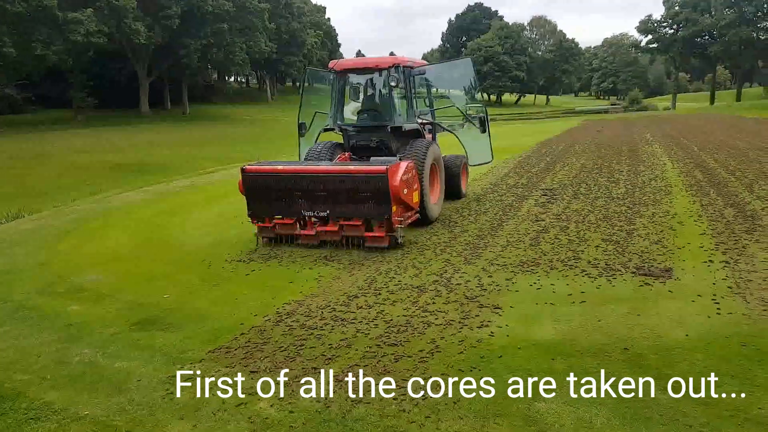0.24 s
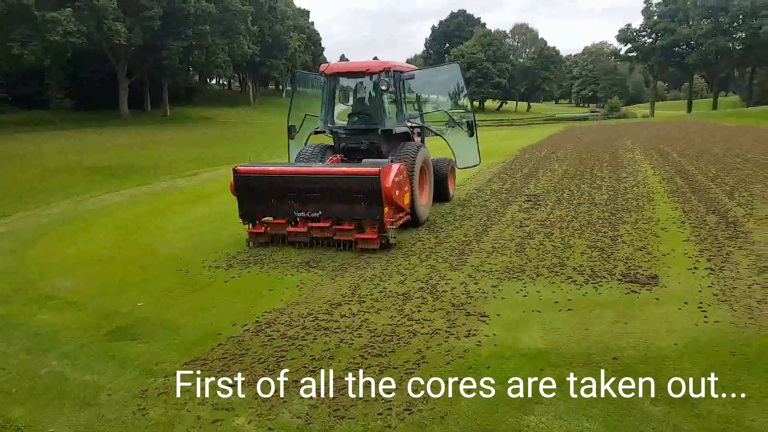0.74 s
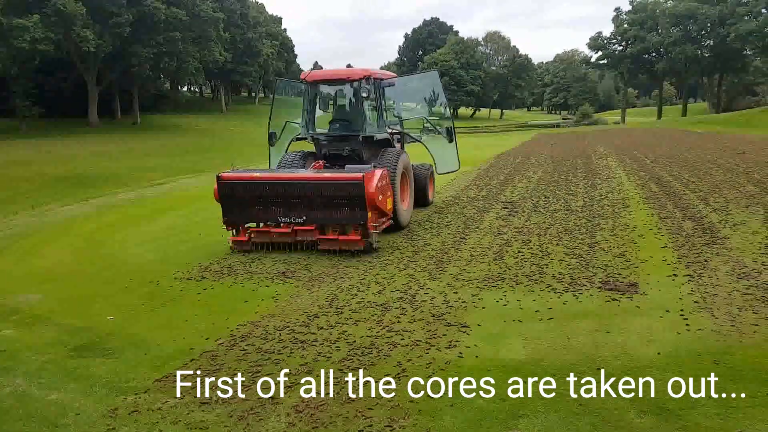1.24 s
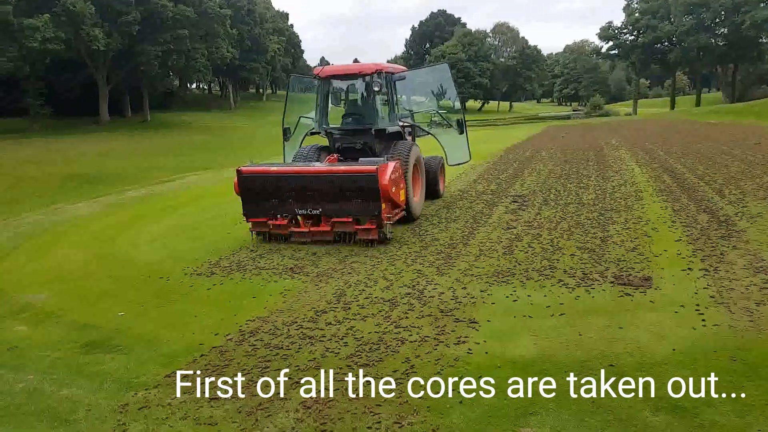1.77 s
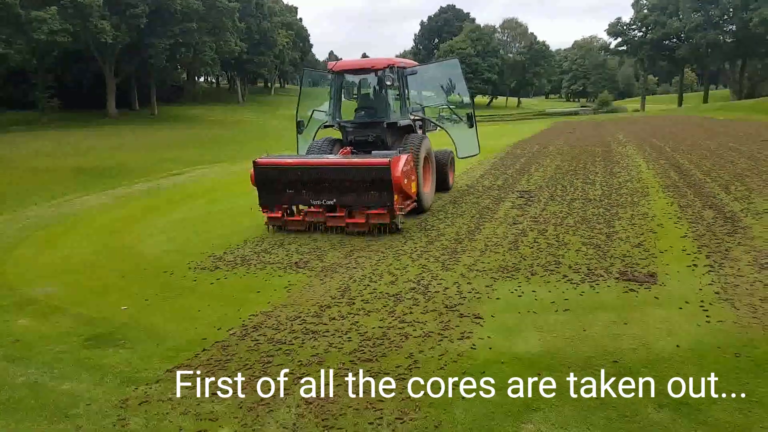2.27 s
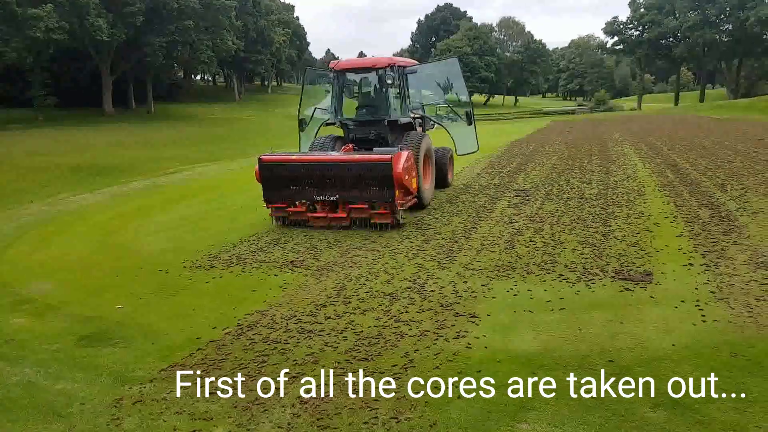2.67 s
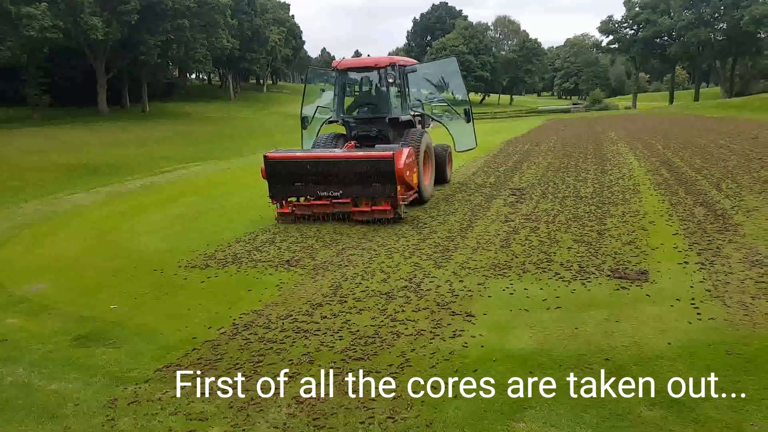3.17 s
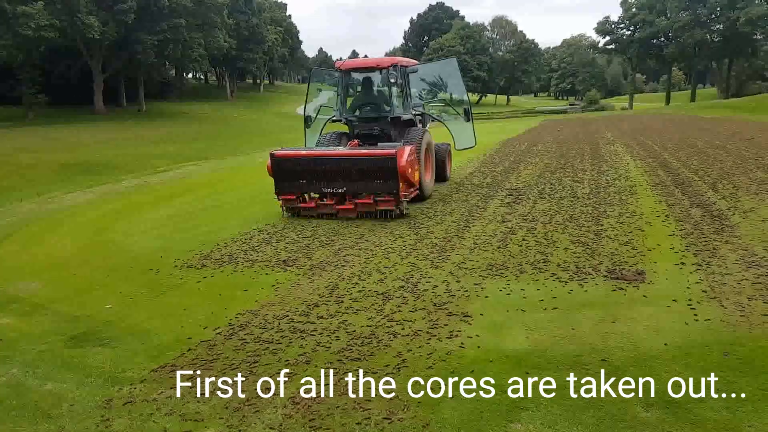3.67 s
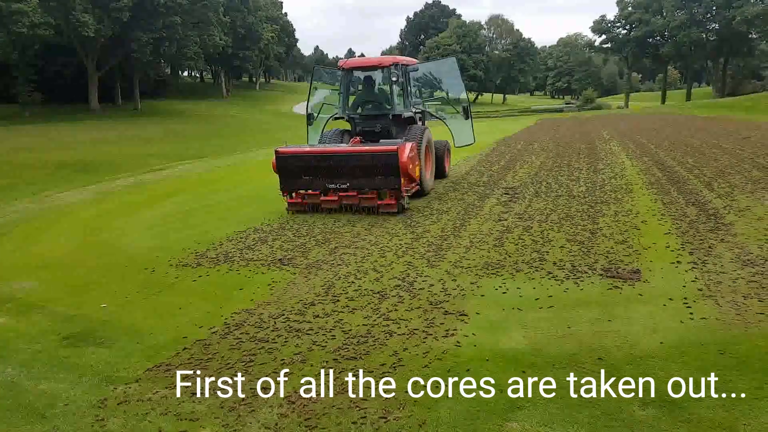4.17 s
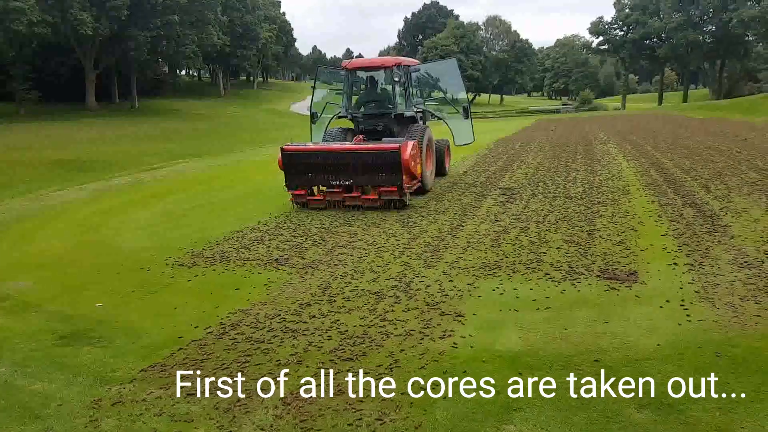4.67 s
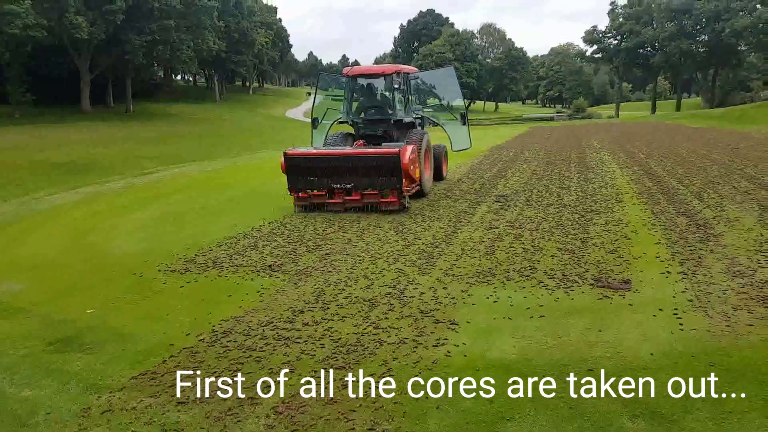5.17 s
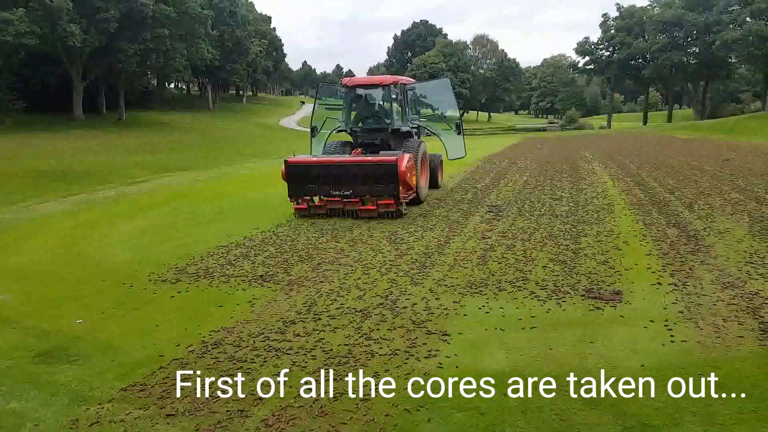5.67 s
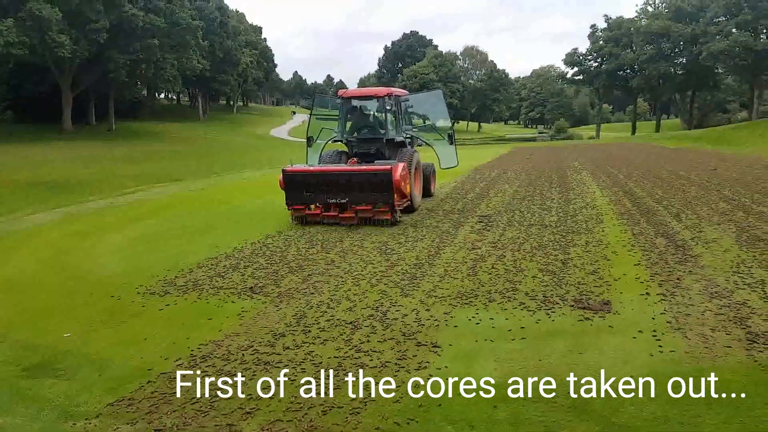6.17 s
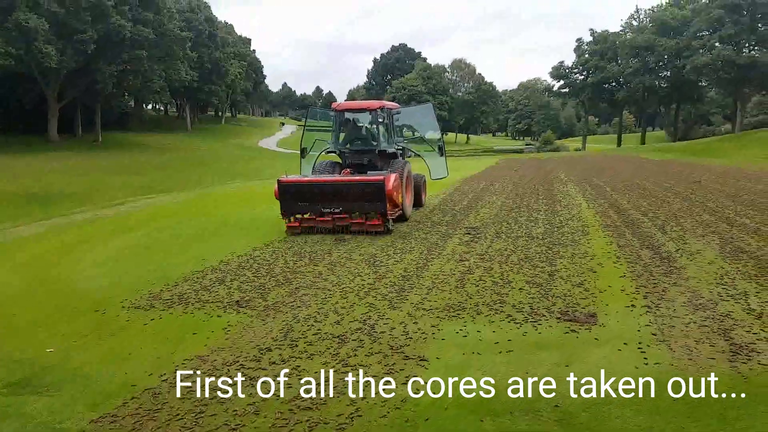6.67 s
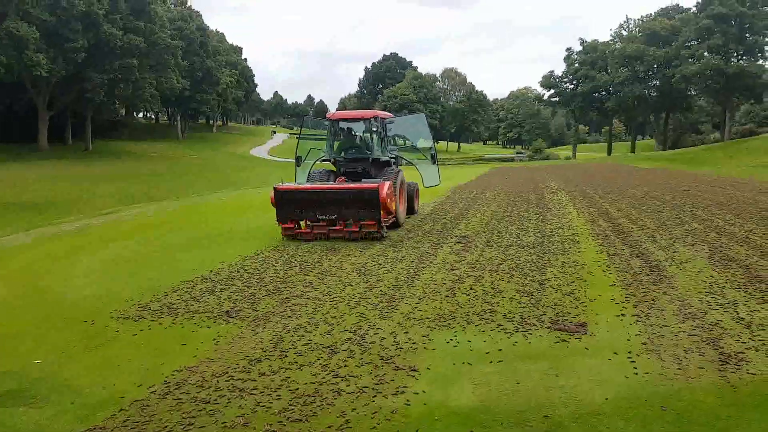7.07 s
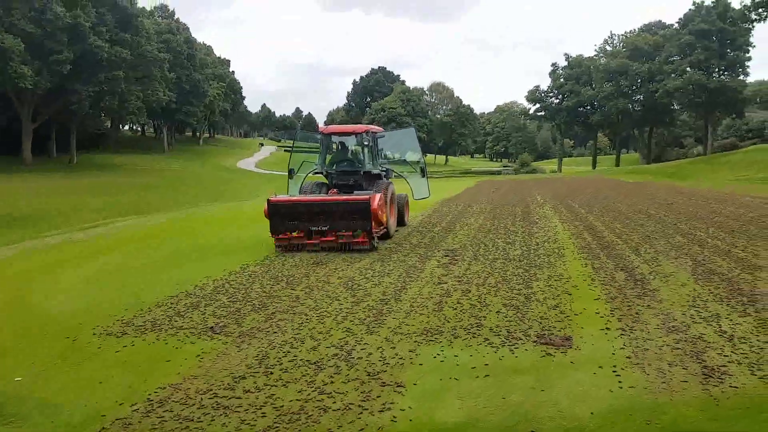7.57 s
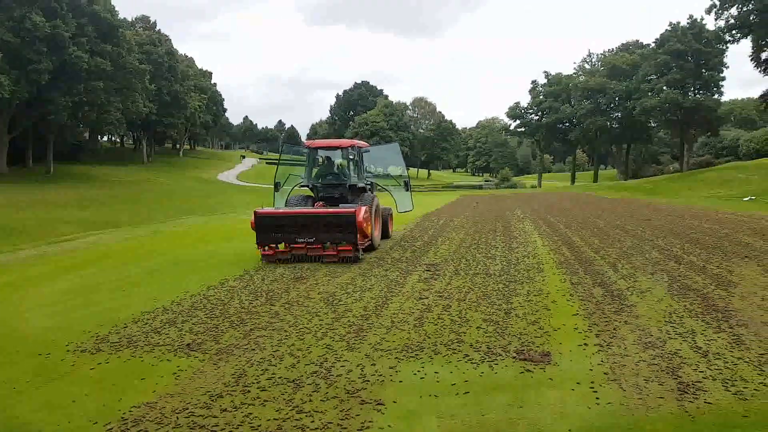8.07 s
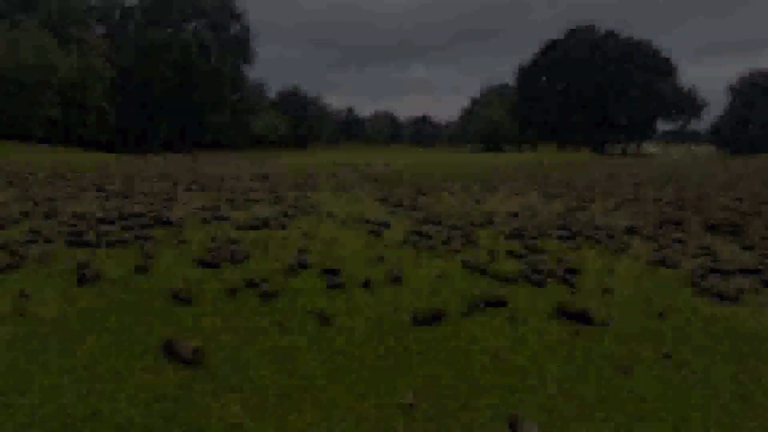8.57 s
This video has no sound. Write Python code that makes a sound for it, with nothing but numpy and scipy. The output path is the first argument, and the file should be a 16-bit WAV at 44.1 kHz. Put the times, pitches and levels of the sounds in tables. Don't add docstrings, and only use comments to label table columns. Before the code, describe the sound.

A rough, low-mid diesel roar with valve clatter and gear whine fills the foreground, with scattered metallic ticks. The engine pitch climbs over a second or so, then holds steady while steel tines clank in a rapid, uneven but regular chatter. Everything recedes gently across open grass, with no room echo, heard through a handheld phone with narrow stereo lows and wider treble, until a sudden cut.

```python
import sys
import numpy as np
from scipy import signal
from scipy.fft import rfft, irfft, next_fast_len
from scipy.io import wavfile
from scipy.ndimage import uniform_filter1d, map_coordinates

SR = 44100
rng = np.random.default_rng(int(sys.argv[2]) if len(sys.argv) > 2 else 0)


def wav_record(signal):
    frames = np.transpose(np.atleast_2d(signal))
    bounded = np.clip(frames, -1, 1)
    quanta = np.round(bounded * 32767).astype(np.int16)
    wavfile.write(sys.argv[1], SR, quanta)


def linear_from_db(decibels):
    return 10 ** (np.asarray(decibels, float) / 20)


N = 389824

# (time [s], firing rate [Hz])
ENGINE_SPEED = [(0, 66.05), (1.3, 66.1), (1.45, 67.2), (1.6, 69.9), (1.75, 72.2), (1.98, 74.1),
                (2.23, 75.9), (2.48, 77.05), (2.73, 77.85), (2.98, 78.25), (3.5, 78.17), (6, 78.2),
                (8.3, 78.3)]
# (multiple of firing [ratio], level [dB])
WEAK_ORDERS = [(0.749, -56.5), (1.4, -43.5), (1.5, -62), (2.75, -36.5), (3.25, -36), (3.5, -38),
               (5.25, -47), (5.75, -45), (7, -50.5), (8, -46)]
# (harmonic [number], level [dB], load group [index])
PUMP_HARMONICS = [(1, -36, 0), (2, -38, 0), (3, -48, 0), (5, -55, 1), (6, -46, 1), (7, -51, 2), (8, -52, 3),
                  (9, -64, 2)]
# (harmonic [number], level [dB])
GEAR_MESH = [(1, -36), (2, -35.5), (3, -56.5), (4, -51.5)]
# (idle [dB], added at full speed [dB], added under throttle [dB], share of distance loss [ratio])
PUMP_LAWS = [
    (1, -9.5, -0.5, .7),
    (-8, 3, -.5, 1.5),
    (-9, -9, -.5, .1),
    (-4, -14, -3, .1),
]
# (group [index], start [s], end [s], gain [dB])
PUMP_SWELLS = [
    (1, 0.2, 1.43, 7.5),
    (1, 0.8, 1.43, 4),
    (2, .2, 1.3, 8.5),
    (2, .7, 1.43, 4),
    (3, -.2, .6, 7.5),
    (1, 1.75, 2.55, 5),
    (1, 3.35, 4.75, 5.5),
]
# (frequency [Hz], level [dB], t60 [s])
TINE_HEADS = [(1505, -2.5, 0.054), (2051, -4, 0.093), (3190, -10.5, 0.11), (3486, -8, 0.049),
              (3840, -14, 0.046), (4200, -20.5, 0.054), (5280, -16, .07), (6160, -22.5, .07),
              (6530, -21.5, .06), (7109, -25, .06), (8300, -22.5, 0.065), (9597, -28, .07),
              (10700, -30.5, 0.062), (11137, -27, 0.067), (11936, -27.5, .07)]
# (time [s], peak [dB], high spray over peak [dB])
LOOSE_KNOCKS = [
    (0.0687, -29, -23),
    (0.2194, -34, -21.5),
    (0.564, -29, -13),
    (0.6894, -32.5, -21.5),
    (1.5894, -31.5, -20.5),
    (1.6794, -36.5, -21),
    (1.7694, -31, -24.5),
]
# (time [s], peak [dB], high spray over peak [dB])
ODD_STROKES = [(1.9939, -25.5, -26.5), (2.1131, -23, -26), (2.2283, -23, -26.5), (2.5611, -23.5, -27),
               (2.6687, -22.5, -23), (2.7744, -33, -22.5), (2.8934, -20.5, -19.5), (3.328, -25, -19),
               (3.4424, -34.5, -22), (3.6531, -25, -23), (3.7658, -24.5, -27.5), (3.9809, -23.5, -25),
               (4.0881, -31.5, -23.5), (4.2049, -27, -17), (4.6433, -23, -17.5), (4.749, -24.5, -20.5),
               (4.8559, -25.5, -26), (4.9666, -25.5, -23), (5.0764, -26, -21.5), (5.299, -24.5, -20.5),
               (5.5154, -35, -22), (5.6194, -26.5, -23), (5.8374, -38.5, -24), (6.2776, -25.5, -27.5),
               (6.7181, -36.5, -25), (6.8194, -33.5, -25), (7.1557, -27, -24), (7.2617, -26, -27),
               (7.3708, -25, -25), (7.8102, -25.5, -27)]
# (time [s], level [dB])
FAN_LEVEL = [(0, -23.5), (1, -30), (2, -28.5), (3, -25.5), (4, -30), (5, -27.5), (6, -29.5), (7, -29.5),
             (8.3, -26.5)]
# (frequency [Hz], density [dB per Hz])
BODY_COLOUR = [(18, -43.5), (30, -29.5), (63, -11.5), (113, -6.5), (152, -2), (194, -2.5), (252, -3.5),
               (417, -4), (595, -5), (744, -8), (1020, -3), (1260, -5.5), (1540, -9), (2160, -15.5),
               (2600, -51.5), (3380, -60), (5720, -120)]
# (frequency [Hz], density [dB per Hz])
CLATTER_COLOUR = [(1290, -30), (2200, -1.5), (2660, -8), (3250, -3), (3720, -8.5), (3960, -6.5),
                  (4790, -12.5), (5680, -18), (6620, -15), (8050, -19.5), (9500, -43.5), (12400, -63.5),
                  (20900, -120)]
# (frequency [Hz], density [dB per Hz])
HISS_COLOUR = [(6000, -30), (8500, -4), (9300, -10), (10300, -6.5), (11200, 0), (12300, -4), (13200, -7),
               (13800, -7), (14200, -3.5), (14900, -7), (15700, -8)]
# (centre [Hz], width [Hz], depth [0-1])
REFLECTION_DIPS = [(783, 63, 0.29), (1252, 117, 0.74), (440, 90, 0.5), (164, 37, 0.31)]
# (frequency [Hz], likeness [-1 to 1])
PORT_LIKENESS = [(60, 0.89), (130, 1.0), (290, 0.98), (640, 0.98), (1410, 0.91), (3100, 0.72), (6820, 0.37),
                 (15000, -0.06)]
# (frequency [Hz], left minus right [dB])
PORT_TILT = [(60, -.4), (1300, -.4), (2400, 1), (3400, 0), (4400, -5.5), (5600, -2), (7000, 7), (8800, 8),
             (11000, 1), (15000, -.5)]
# (frequency [Hz], left lead [radians])
PORT_LEAD = [(60, 0), (300, -.03), (700, 0), (1800, .4), (3500, -.1), (4500, .7), (6100, -.1), (7600, 1.2),
             (9000, 1)]

SHARED_ONLY = np.array([[1], [0]])


def exhaust(turns):
    out = line(turns, 0.99, law((-26, -.3, 2.5, .3)), sway_db=0.31, drift=.05)
    out += line(turns, 2, law((-38, 11, 2, 0.34)), sway_db=.8, drift=.1)
    out += line(turns, 7 / 4, law((-33, 3.5, -1, 0.22)), sway_db=.8, drift=0.11)
    out += line(turns, 3, law((-29, -4, 1.5, .5)), sway_db=2.5, drift=.4)
    for multiple, db in WEAK_ORDERS:
        out += line(turns, multiple, db, sway_db=2.5, drift=0.47)
    return out


def pump(turns):
    load_db = [pump_load(group) for group in range(len(PUMP_LAWS))]
    return sum(line(turns, 9 * k, db + load_db[group], sway_db=2.2, drift=.8) for k, db, group in PUMP_HARMONICS)


def pump_load(group):
    t = np.arange(N) / SR
    level = law(PUMP_LAWS[group])

    def opened(s):
        return (1 + np.tanh((t - s) / .06)) / 2

    for swell_group, start, end, db in PUMP_SWELLS:
        if round(swell_group) == group:
            level = level + db * (opened(start) - opened(end))
    return level


def gears(turns):
    gear_db = law((0, 6.5, -1.5, 2.9))
    out = np.zeros(N)
    for k, db in GEAR_MESH:
        softening_db = 4 * (k > 1) * (turns > 100)
        out += line(turns, 41 / 4 * k, db + gear_db * np.sqrt(k) - softening_db, sway_db=1.5, drift=.5)
    return out


def line(turns, multiple, db, sway_db, drift):
    knots = rng.standard_normal((2, 160))
    size, slip = (np.interp(np.arange(N), np.linspace(0, N, 160), row) for row in knots)
    return np.sqrt(2) * linear_from_db(db + sway_db * size) * np.cos(2 * np.pi * multiple * turns + drift * slip)


def tines(turns):
    arm = [(4700, 0, .08), (4900, 0, .07)]
    pin = [(7435, 0, .13)]
    t = np.arange(SR // 8) / SR
    ring, low, mid, high = np.zeros((4, N + SR))
    for s, db, low_db, high_db, arm_db, pin_db in strokes(turns):
        rattle_s = 0.029 + 0.0013 * (db + 25)
        rattle = (1 - np.exp(-t / 0.0032)) / (1 + (t / rattle_s) ** 4)
        rattle *= 1 + .2 * np.exp(-t / .008)
        at = slice(round(s * SR), round(s * SR) + len(t))
        ring[at] += linear_from_db(db - 3) * struck(TINE_HEADS, t, scatter_db=3.5)
        ring[at] += linear_from_db(db + 1.1 * arm_db - 5) * struck(arm, t, scatter_db=3)
        ring[at] += linear_from_db(db + 2 * pin_db + 19) * struck(pin, t, scatter_db=2.5)
        low[at] += linear_from_db(db + low_db - 9) * rattle
        mid[at] += linear_from_db(db - 11.5) * rattle
        high[at] += linear_from_db(db + high_db - 4) * rattle
    grit = linear_from_db(1.4 * wobble(250))
    low_colour = [(300, -26), (900, 4.5), (1600, 0), (2300, -7.5), (3300, -15.5), (4200, -40)]
    mid_colour = [(2500, -26.5), (4000, 3), (5000, -1.5), (6500, -1), (8000, -8), (9200, -32.5)]
    high_colour = [(8000, -30), (9500, -4), (11200, 0), (13000, -4), (15500, -8)]
    spray = low[:N] * rush(low_colour, patchy_db=5.5)
    spray += mid[:N] * rush(mid_colour, patchy_db=0.5)
    spray += high[:N] * linear_from_db(2.2 * wobble(400)) * rush(high_colour, patchy_db=2.5)
    unshared_ring = np.roll(ring, shift=40)
    return np.array([ring[:N], unshared_ring[:N]]) + grit * spray


def strokes(turns):
    count, firings_per_stroke, first_s = 58, 8.531, 1.8845
    geared = np.interp(first_s * SR, np.arange(N), turns) + firings_per_stroke * np.arange(count)
    at = np.interp(geared, turns, np.arange(N)).astype(int)
    scatter_db = [.8, 3, 2, 1.5]
    size, low, high, arm = (rng.standard_normal((count + len(LOOSE_KNOCKS), 4)) * scatter_db).T
    peak_db = law((-26.3, 0, 3, .3))[at] + size[:count]
    rows = np.array([at / SR, peak_db, -24.5 + high[:count]]).T
    for row in ODD_STROKES:
        rows[np.abs(at / SR - row[0]).argmin()] = row
    s, db, high_db = np.vstack([LOOSE_KNOCKS, rows]).T
    pings_s = [1.88, 1.99, 2.23, 2.77, 4.53, 4.64]
    caught = np.abs(s[:, None] - pings_s).min(axis=1) < .03
    pin_db = np.where(caught, -16.5 - (db + 26) / 2, -26)
    low_db = -24 - db - .3 * s + low
    arm_db = -14 + .75 * s + arm
    return zip(s, db, low_db, high_db, arm_db, pin_db)


def struck(modes, t, scatter_db):
    hz, level, t60 = np.transpose(modes)[:, :, None]
    latest_s = [[[.004]], [[.016]], [[.03]]]
    late = np.clip(t - latest_s * rng.random((3, len(hz), 1)), 0, None)
    strength_db = level + rng.normal(0, scatter_db, (3, len(hz), 1))
    return (linear_from_db(strength_db - 60 * late / t60) * np.sin(2 * np.pi * hz * late)).sum((0, 1))


def engine_noise(turns):
    beat = np.cos(2 * np.pi * turns) + 0.44 * np.cos(np.pi / 2 * turns)
    shake = wobble(14)
    body_db = law((-22.5, 3, 0.1, 0.96)) + 1.5 + 0.26 * beat + 0.51 * shake
    clatter_db = law((-35.5, 3, 0.7, 0.73)) + 0.32 * beat + .5 * shake + 1.1 * wobble(40)
    bonnet_db = law((-32, -0.5, 2, 1.9)) + .7 * shake
    hiss_db = law((-60, 7, -1, .3)) + .6 * beat + .5 * wobble(25)
    bonnet_colour = [(400, -31), (520, 5), (600, 1), (690, 2.0), (850, -33)]
    out = linear_from_db(body_db) * rush(BODY_COLOUR, patchy_db=0.5)
    out += linear_from_db(clatter_db) * rush(CLATTER_COLOUR, patchy_db=0.5)
    out += linear_from_db(bonnet_db) * rush(bonnet_colour, patchy_db=2.5)
    return out + linear_from_db(hiss_db) * rush(HISS_COLOUR, patchy_db=1.0)


def fan(turns):
    blade_phase = 2 * np.pi * 3.1 * turns
    hump = wobble(70) * np.cos(blade_phase) + wobble(70) * np.sin(blade_phase)
    skirts = .65 * wobble(220) * np.cos(2 * np.pi * 3.2 * turns)
    throb_db = 0.99 * np.cos(np.pi / 2 * turns)
    blades = linear_from_db(1.5 * wobble(18) + throb_db) * (hump + skirts)
    return linear_from_db(curves(FAN_LEVEL)[0]) * unit(blades)


def ground(hz):
    return np.prod([1 - np.clip(depth, 0, .95) / (1 + ((hz - centre) / width * 2) ** 2)
                    for centre, width, depth in REFLECTION_DIPS], axis=0)


def law(row):
    idle_db, full_db, surge_db, share = row
    idle_hz, full_hz, surge_hz_per_s = 66.1, 78.2, 6
    away_per_s = 0.094
    speed, = curves(ENGINE_SPEED)
    rise = uniform_filter1d(np.gradient(speed) * SR, size=SR // 5)
    surge = np.tanh(rise / surge_hz_per_s)
    distance_db = 20 * np.log10(1 + away_per_s * np.arange(N) / SR)
    return idle_db + full_db * (speed - idle_hz) / (full_hz - idle_hz) + surge_db * surge - share * distance_db


def rush(spectrum, patchy_db):
    z = signal.stft(rng.standard_normal((2, N)), nperseg=512)[2]
    field = uniform_filter1d(rng.standard_normal(z.shape[1:]), size=5, axis=0)
    field = uniform_filter1d(field, size=10, axis=1)
    pair = signal.istft(z * linear_from_db(patchy_db * unit(field)), nperseg=512)[1][:, :N]
    return unit(filtered(pair, lambda hz: linear_from_db(along(spectrum, hz))))


def wobble(rate):
    knots = rng.standard_normal(int(N * rate / SR) + 4)
    return map_coordinates(knots, [np.arange(N) * rate / SR])


def filtered(x, response):
    m = next_fast_len(N + 8192)
    return irfft(rfft(x, m) * response(np.fft.rfftfreq(m, 1 / SR)), m)[..., :N]


def unit(x):
    return x / np.sqrt(np.mean(x ** 2) + 1e-20)


def along(points, hz):
    f, v = np.transpose(points)
    return np.interp(np.log(hz + 1), np.log(f + 1), v)


def curves(rows):
    s, *cols = np.transpose(rows)
    return [np.interp(np.arange(N) / SR, s, c) for c in cols]


def scene():
    turns = np.cumsum(curves(ENGINE_SPEED)[0]) / SR
    tones = exhaust(turns) + pump(turns) + gears(turns)
    noise = engine_noise(turns) + fan(turns) * SHARED_ONLY
    field = tines(turns) + tones * SHARED_ONLY + filtered(noise, ground)

    def split(hz):
        angle = np.arccos(np.clip(along(PORT_LIKENESS, hz), 0, 1)) / 2
        return np.array([np.cos(angle), np.sin(angle)])

    def ports(hz):
        left = linear_from_db(along(PORT_TILT, hz) / 2) * np.exp(.5j * along(PORT_LEAD, hz))
        return np.array([left, 1 / left])

    mid, side = filtered(field, split)
    return filtered(np.array([mid + side, mid - side]), ports)


def roll_off(x):
    return signal.sosfilt(signal.butter(12, 15880, fs=SR, output="sos"), x)


def record(dry):
    dry = filtered(dry, lambda hz: hz < 15750)
    cut_s, fade_s = 8.2345, 0.0019
    gate = np.clip((cut_s - np.arange(N) / SR) / fade_s, 0, 1)
    return roll_off(dry * gate)


dry = scene()
out = record(dry)
wav_record(out)
```